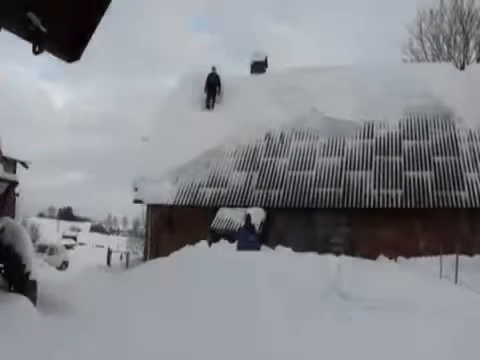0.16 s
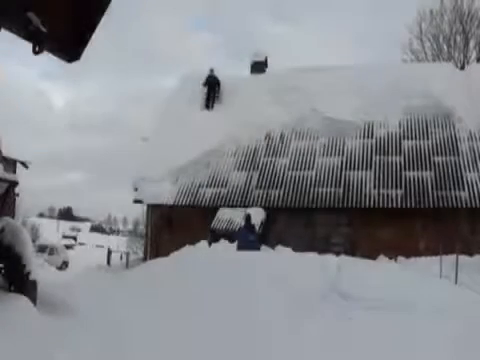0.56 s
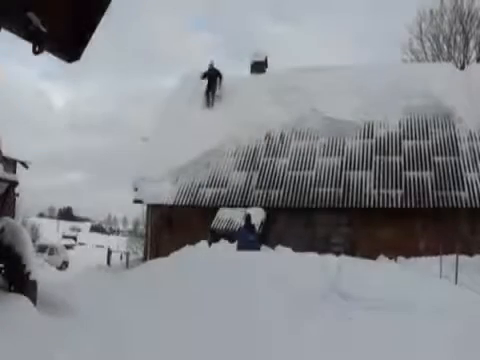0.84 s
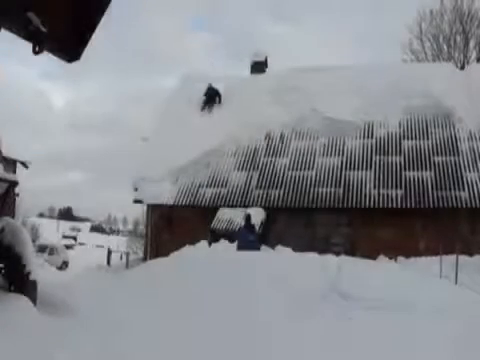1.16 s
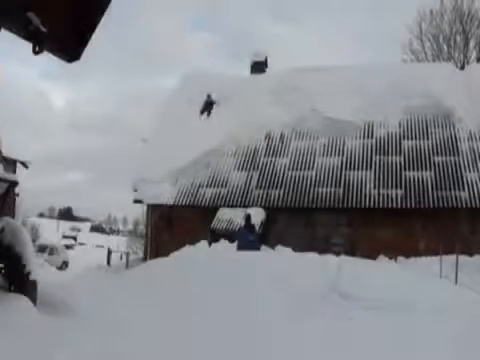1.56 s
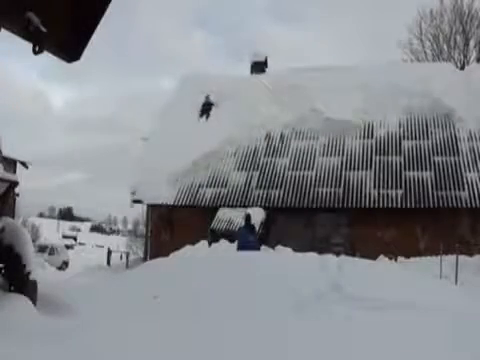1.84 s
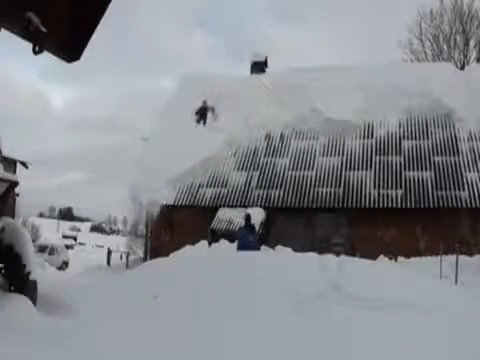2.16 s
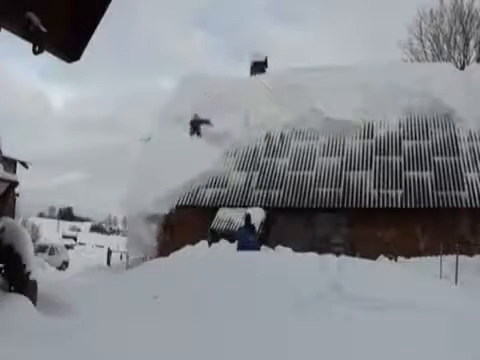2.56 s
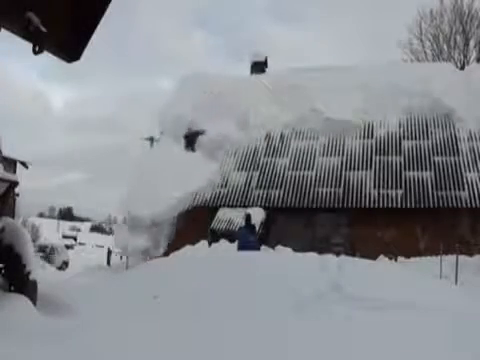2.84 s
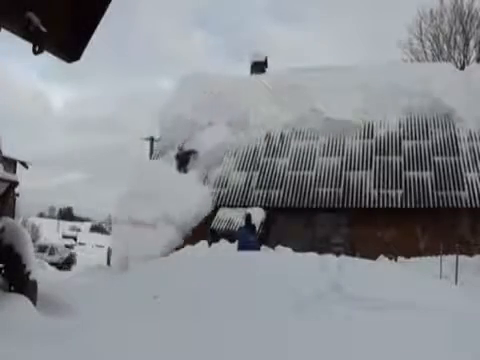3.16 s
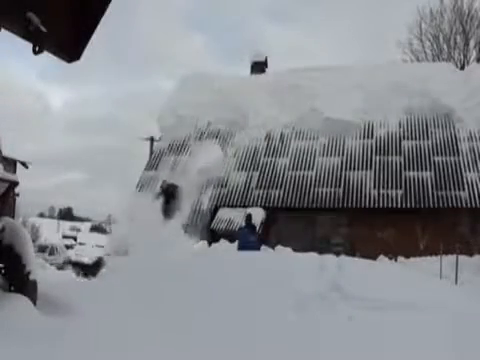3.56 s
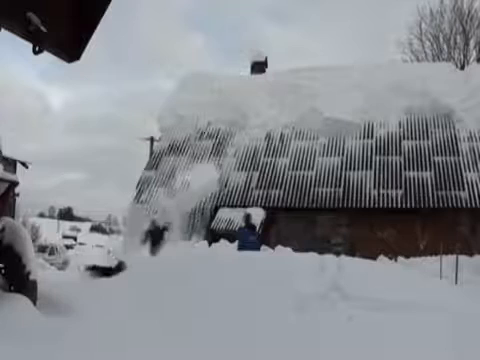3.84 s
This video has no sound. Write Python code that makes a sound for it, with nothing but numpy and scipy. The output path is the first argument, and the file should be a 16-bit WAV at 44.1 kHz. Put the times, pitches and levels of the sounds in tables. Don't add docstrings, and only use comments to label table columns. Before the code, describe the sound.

A snow slab slides down a ribbed metal roof, heard across a yard. Low hiss and a very faint far whine lie underneath; soft boot crunches come at 0.7 and 1.25 s. At 1.45 s a thump releases an abrupt grainy roar, with rib rattle and bright hiss, loudest around 2.8-3.5 s. Crust scrapes, a hard knock near 3.1 s and low thuds join; it weakens by 3.8 s but continues to the end.

```python
import sys
import numpy as np
from scipy import signal
from scipy.fft import rfft, irfft, next_fast_len
from scipy.io import wavfile

SR = 44100
rng = np.random.default_rng(int(sys.argv[2]) if len(sys.argv) > 2 else 0)


def to_wav(s):
    ch = np.atleast_2d(s).T
    pcm = np.round(np.clip(ch, -1, 1) * 32767)
    wavfile.write(sys.argv[1], SR, pcm.astype(np.int16))


def field_ratio(decibels):
    return 10 ** (np.asarray(decibels, dtype=float) / 20)


N = 176400

# (frequency [Hz], density [dB per Hz])
FLOOR_COLOUR = [(25, -11), (81, -5), (520, -2), (1500, -5.5), (2000, -8.5), (2400, -9.5), (6000, -13),
                (15000, -14.5)]
# (frequency [Hz], likeness [0-1])
FLOOR_LIKENESS = [(60, 1), (300, 0.24), (3000, 0.43), (6000, 0.97), (14000, 1)]
# (frequency [Hz], likeness [0-1])
ROOF_LIKENESS = [(60, 0.98), (250, 0.99), (1500, 0.99), (3000, 1), (14000, 1)]
# (start [s], length [s], level [dB], centre [Hz], width [octaves])
BOOT_CRUNCHES = [
    (0.687, .07, -62.5, 6000, 1.6),
    (0.728, 0.048, -64, 400, 2.3),
    (1.25, .22, -58, 5300, 1.4),
    (1.32, 0.082, -59.5, 378, 1.3),
    (1.26, 0.27, -62.5, 1810, 0.38),
    (1.36, 0.13, -61, 605, 1.5),
]
# (time [s], level [dB], pitch [Hz], length [s])
LUMP_THUDS = [
    (1.447, -45.5, 288, 0.082),
    (1.449, -60.5, 50, 0.07),
    (2.918, -57, 61, 0.039),
    (3.019, -47.5, 300, 0.035),
    (3.16, -58, 60, .08),
    (3.39, -50, 79.4, 0.058),
    (3.446, -53, 81, 0.054),
    (3.67, -59, 70, 0.05),
    (3.905, -73, 45, .08),
]
# (start [s], length [s], level [dB], centre [Hz], width [octaves])
CRUST_SCRAPES = [(2.74, .11, -41, 3900, .45), (2.82, .15, -40, 4000, .55), (2.72, 0.28, -45, 2600, .8),
                 (3.0, 0.22, -47, 1520, 0.76), (3.19, .12, -41, 1750, 0.54), (2.95, .34, -46, 4200, .7),
                 (3.64, .14, -50, 3800, .8), (3.086, .012, -33, 1000, 1.5), (2.13, 0.31, -43.5, 7200, 0.36),
                 (1.65, .3, -47, 520, .8), (3.9, .1, -53.5, 4300, .8), (3.68, .11, -46, 8000, 1.0),
                 (3.27, .05, -41, 700, 1.5), (3.36, .15, -42, 600, 1.2)]
# (time [s], level [dB])
DRUMMING_LEVEL = [(1.43, -62), (1.45, -53), (1.458, -41.5), (1.51, -39), (1.6, -40.5), (1.9, -42.5),
                  (2.05, -41.5), (2.2, -42), (2.4, -39.5), (2.47, -40), (2.8, -38), (3.0, -37), (3.25, -37),
                  (3.45, -37), (3.55, -38.5), (3.72, -41), (3.82, -44), (4.0, -43)]
# (time [s], level [dB])
RUBBING_LEVEL = [(1.43, -65), (1.45, -63), (1.458, -50), (1.51, -40.5), (1.61, -44), (2.0, -42), (2.3, -41),
                 (2.42, -40.5), (2.82, -38.5), (3.05, -39), (3.24, -39), (3.32, -43.5), (3.66, -42),
                 (3.73, -41), (3.82, -43), (4.0, -43)]
# (frequency [Hz], density [dB per Hz])
SHEET_COLOUR = [(110, -13), (190, -15.5), (260, -7.5), (570, 0), (850, 0.5), (1100, -5), (1500, -15)]
# (frequency [Hz], density [dB per Hz])
RIB_COLOUR = [(700, -15), (1150, 0), (2100, 0), (2350, -11), (3000, -15)]
# (frequency [Hz], density [dB per Hz])
HISS_COLOUR = [(1500, -17.5), (2500, -5), (4200, -3), (5600, -4), (7400, -0.5), (10000, -7.5), (15000, -21)]

RELEASE_S = 1.44
FLOOR_DB, WIDTH_FLICKER_DB = -58.5, 3
WHINE_HZ, WHINE_WIDTH_HZ, WHINE_DB = 1957, 130, -79
ECHO_S, ECHO_SHARE, ECHO_CUT_HZ = 0.0239, 0.39, 2100
PORT_LEAD_RAD, PORT_CUT_HZ = 0.24, 1400
GRAINS_PER_S, GRAIN_SPREAD_DB = 5000, 1.3
POWDER_SHARE = 0.84
CRUST_CLICKS_PER_S = 900
RUMBLE_DB, RUMBLE_RISE_DB_PER_S, RUMBLE_TOP_HZ = -81, 7, 93
RIBS_DB, RIBS_FOLLOW_DRUMMING = -3.5, 0.56


def rms_one(x):
    return x / np.sqrt(np.mean(x ** 2) + 1e-20)


def at_hz(points, hz):
    table_hz, values = np.transpose(points)
    return np.interp(np.log(hz), np.log(table_hz), values)


def moving(rows):
    time_s, db = np.transpose(rows)
    return field_ratio(np.interp(np.arange(N) / SR, time_s, db, left=-120))


def drift(rate_hz):
    pole = np.exp(-2 * np.pi * rate_hz * 40 / SR)
    noise = rng.standard_normal(N // 40 + 2002)
    slow = signal.lfilter([1], [1, -2 * pole, pole * pole], noise)[2000:]
    return np.interp(np.arange(N) / 40, np.arange(len(slow)), rms_one(slow))


def coloured(source, spectrum, likeness, patchy_db, rate_hz):
    hz = np.maximum(np.fft.rfftfreq(N, 1 / SR), 10)
    alike = np.clip(at_hz(likeness, hz), 0, .999)
    low_hz, high_hz = spectrum[0][0], spectrum[-1][0] * 1.5
    inside = 1 / (1 + (low_hz / hz) ** 4) / (1 + (hz / high_hz) ** 8)
    mid_side = rfft(source) * field_ratio(at_hz(spectrum, hz)) * inside * np.sqrt([1 + alike, 1 - alike])
    together = drift(rate_hz / 2)
    width = field_ratio(WIDTH_FLICKER_DB * drift(5.0)) * [[1], [-1]]
    place = np.clip(np.log2(hz / 40) * 4 / 3, 0, 12)
    out = 0
    for band in range(13):
        share = np.clip(1 - abs(place - band), 0, 1)
        if np.any(share * inside > .05):
            flicker = field_ratio(patchy_db * (together + drift(rate_hz)))
            mid, side = irfft(share * mid_side, N) * flicker
            out = out + mid + side * width
    return rms_one(out)


def burst(start_s, length_s, db, hz, octaves, rise, source):
    first, n = int(start_s * SR), int(length_s * SR)
    edges_hz = [hz * 2 ** (-octaves / 2), hz * 2 ** (octaves / 2)]
    band = signal.butter(2, edges_hz, "band", fs=SR, output="sos")
    swell = np.interp(np.arange(n) / n, [0, rise, 1], [0, 1, 0]) ** 0.41
    out = np.zeros(N)
    out[first:first + n] = field_ratio(db) * swell * rms_one(signal.sosfilt(band, source)[first:first + n])
    return out


def snow_grains(shape):
    unevenness = np.minimum(rng.exponential(1, shape), 5)
    sizes = field_ratio(GRAIN_SPREAD_DB * unevenness) * rng.standard_normal(shape)
    clicks = rms_one(sizes * (rng.random(shape) < GRAINS_PER_S / SR))
    powder = rng.standard_normal(shape)
    return np.sqrt(1 - POWDER_SHARE) * clicks + np.sqrt(POWDER_SHARE) * powder


def hiss_floor():
    noise = rng.standard_normal((2, N))
    return field_ratio(FLOOR_DB) * coloured(noise, FLOOR_COLOUR, FLOOR_LIKENESS, patchy_db=0.54, rate_hz=4.3)


def far_whine():
    peak = signal.iirpeak(WHINE_HZ, WHINE_HZ / WHINE_WIDTH_HZ, fs=SR)
    once = signal.lfilter(*peak, rng.standard_normal(N))
    return field_ratio(WHINE_DB + 1.5 * drift(4.0)) * rms_one(signal.lfilter(*peak, once))


def near_wall_and_ports(x):
    size = next_fast_len(N + SR // 10)
    hz = np.fft.rfftfreq(size, 1 / SR)
    dullness = 1 / (1 + (hz / ECHO_CUT_HZ) ** 2)
    echo = 1 + ECHO_SHARE * dullness * np.exp(-2j * np.pi * hz * ECHO_S)
    lead = PORT_LEAD_RAD * hz / PORT_CUT_HZ / (1 + (hz / PORT_CUT_HZ) ** 4)
    ports = np.exp(1j * lead * [[1], [-1]])
    return irfft(rfft(x, size) * echo * ports, size)[:, :N]


def boot_crunches(grit):
    clicks = rng.standard_normal(N) * (rng.random(N) < CRUST_CLICKS_PER_S / SR)
    crust = grit + .8 * rms_one(clicks)
    return sum(burst(*row, rise=0.57, source=crust) for row in BOOT_CRUNCHES)


def piling_rumble(grit):
    t = np.arange(N) / SR
    band = signal.butter(2, [25, RUMBLE_TOP_HZ], "band", fs=SR, output="sos")
    level_db = RUMBLE_DB + RUMBLE_RISE_DB_PER_S * (t - RELEASE_S) + 2.0 * drift(4.7)
    return rms_one(signal.sosfilt(band, grit)) * (t > RELEASE_S) * field_ratio(level_db)


def lump_thuds(grit):
    return sum(burst(time_s, length_s, db, hz, octaves=0.75, rise=0.23, source=grit)
               for time_s, db, hz, length_s in LUMP_THUDS)


def crust_scrapes(grit):
    return sum(burst(*row, rise=0.55, source=grit) for row in CRUST_SCRAPES)


def roof_slide():
    def layer(colour, patchy_db, rate_hz):
        return coloured(snow_grains((2, N)), colour, ROOF_LIKENESS, patchy_db, rate_hz)

    drumming, rubbing = moving(DRUMMING_LEVEL), moving(RUBBING_LEVEL)
    rattling = drumming ** RIBS_FOLLOW_DRUMMING * rubbing ** (1 - RIBS_FOLLOW_DRUMMING)
    roar = drumming * field_ratio(-2.0) * layer(SHEET_COLOUR, patchy_db=.7, rate_hz=8.0)
    ribs = rattling * field_ratio(RIBS_DB) * layer(RIB_COLOUR, patchy_db=.5, rate_hz=8.0)
    hiss = rubbing * field_ratio(2.0) * layer(HISS_COLOUR, patchy_db=.5, rate_hz=12.0)
    return roar + ribs + hiss


def scene():
    grit = snow_grains(N)
    contacts = boot_crunches(grit) + piling_rumble(grit) + lump_thuds(grit) + crust_scrapes(grit)
    return near_wall_and_ports(roof_slide() + contacts) + hiss_floor() + far_whine()


def roll_off(x):
    return signal.sosfilt(signal.butter(12, 14970, fs=SR, output="sos"), x)


def record(dry):
    return roll_off(dry)


dry = scene()
out = record(dry)
to_wav(out)
```